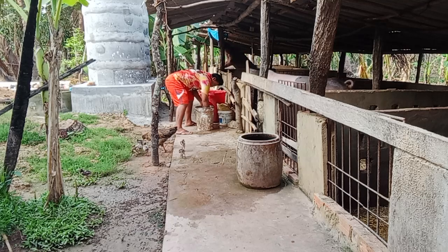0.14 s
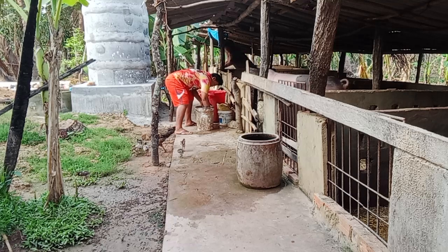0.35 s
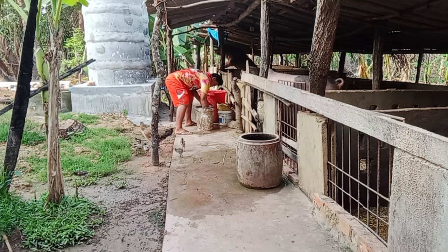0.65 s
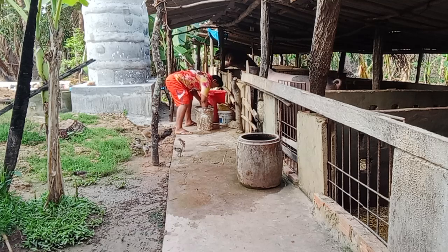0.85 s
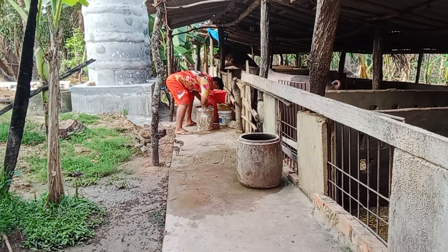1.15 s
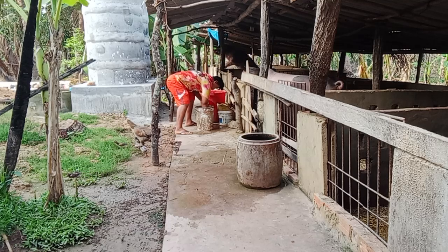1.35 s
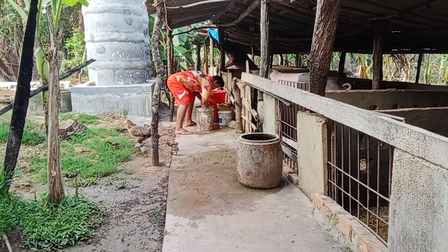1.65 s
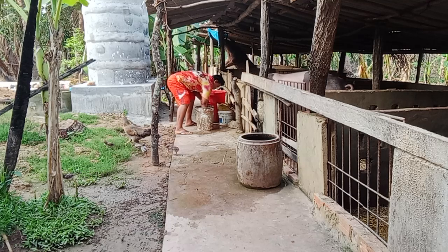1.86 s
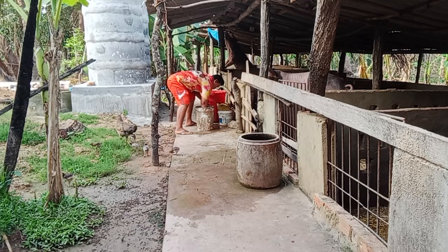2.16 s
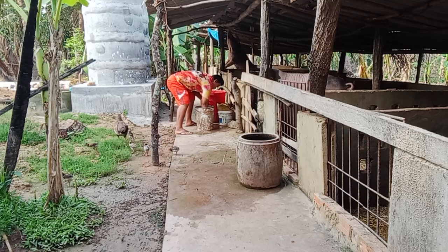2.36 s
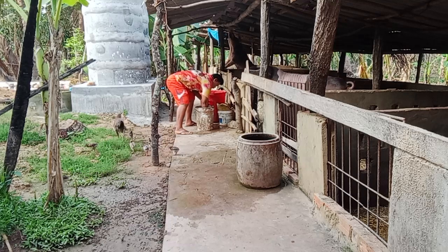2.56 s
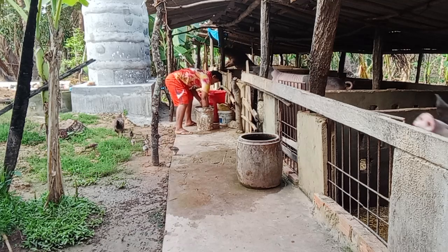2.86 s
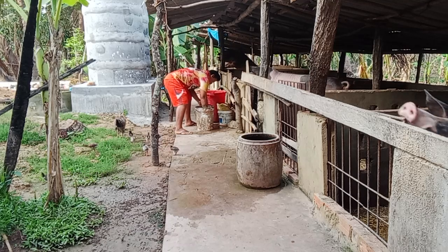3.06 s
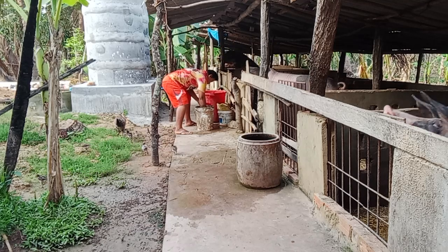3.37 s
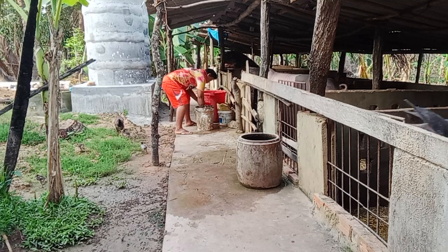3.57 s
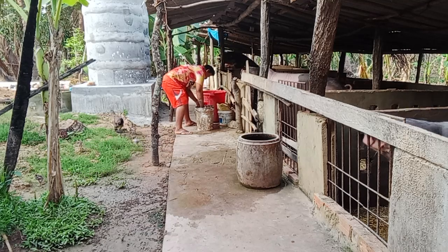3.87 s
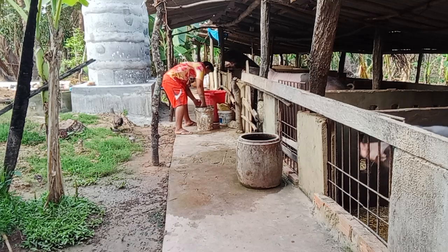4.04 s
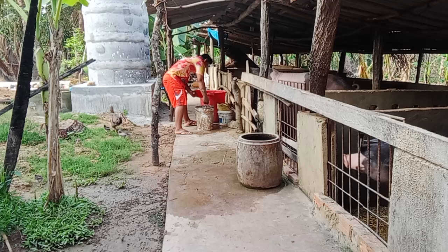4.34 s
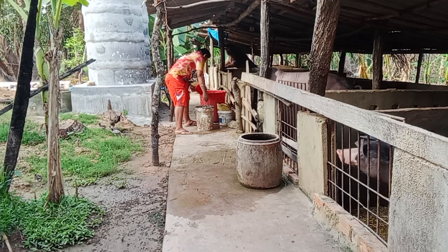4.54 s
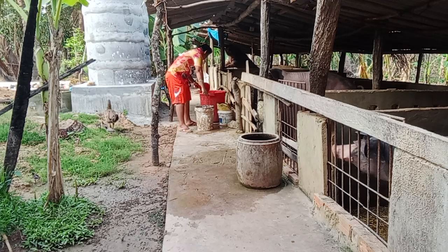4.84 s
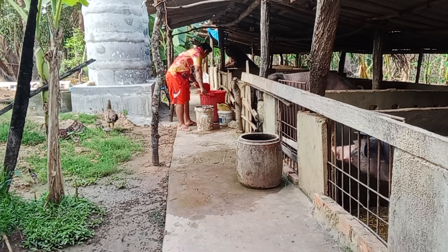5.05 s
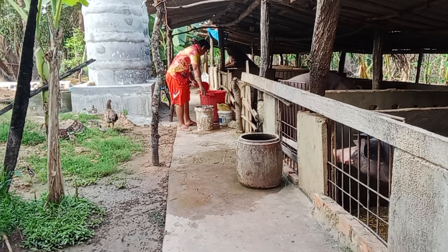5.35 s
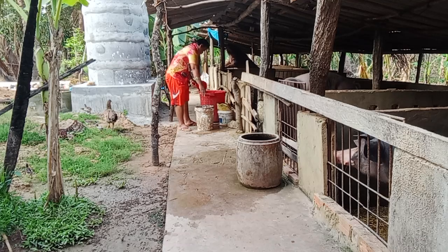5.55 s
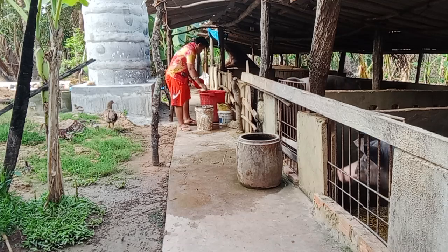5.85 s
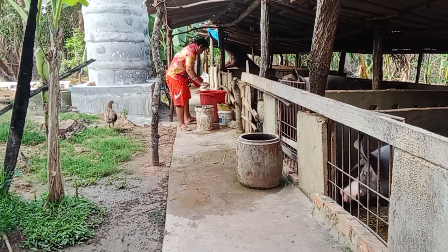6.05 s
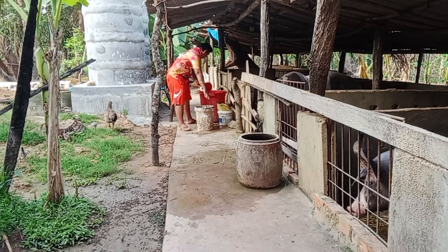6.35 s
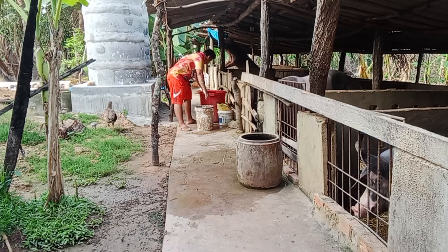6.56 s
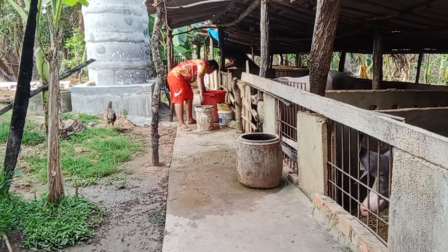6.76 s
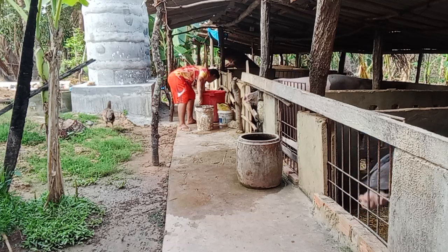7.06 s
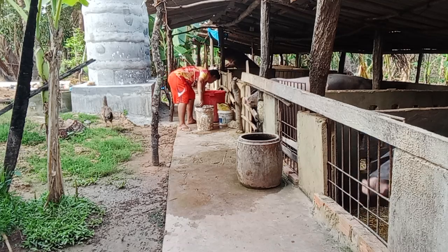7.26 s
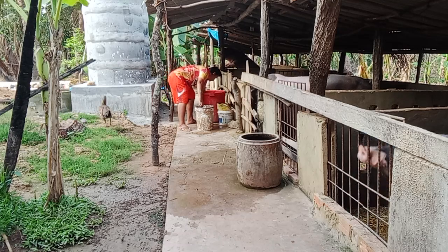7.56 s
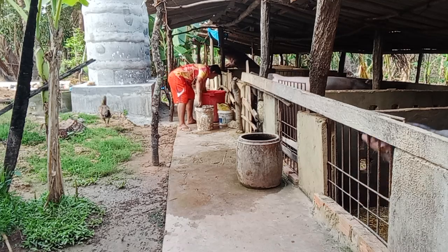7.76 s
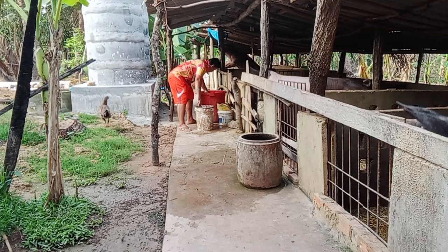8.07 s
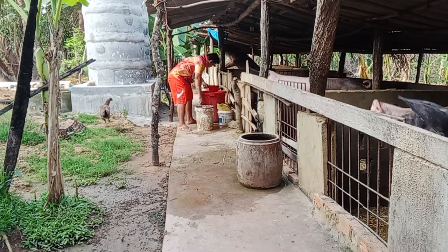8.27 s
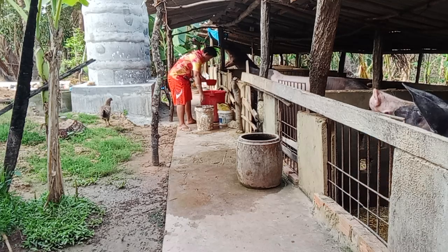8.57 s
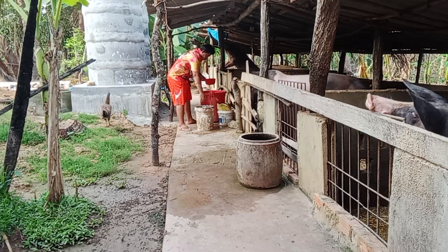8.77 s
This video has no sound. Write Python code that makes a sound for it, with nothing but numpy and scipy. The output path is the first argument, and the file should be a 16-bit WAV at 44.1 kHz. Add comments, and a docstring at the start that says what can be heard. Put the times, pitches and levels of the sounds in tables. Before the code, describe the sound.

Rough, rattling pig grunts and throaty barks over constant chick peeps, with feed swishes, a faint rooster crow and one booming wall bump.

```python
"""Over a restless yard that slowly ebbs, a grunt and then a bark open a chorus of hungry pigs under a tin roof.
Flapping throats excite mouth and snout resonances; chicks peep throughout as tones that break and plunge.
From 2 s feed swishes as filtered noise, clucks and a grunt-like pop are rough pulses, tiny chips twitter.
A thin, strained crow of gliding partials sounds from a distant rooster at 4 s, then a soft moan; past 6 s
a pig thumps the pen wall, whose modes ring, and two light knocks follow as bursts of resonant noise."""
import sys
import numpy as np
from scipy import signal
from scipy.fft import rfft, irfft, next_fast_len
from scipy.io import wavfile
from scipy.ndimage import uniform_filter1d, minimum_filter1d, map_coordinates

SR = 44100
rng = np.random.default_rng(int(sys.argv[2]) if len(sys.argv) > 2 else 0)


def master_out(mix):
    """Clip the mix to full scale and print it as 16-bit PCM to the path in sys.argv[1]."""
    frames = np.transpose(np.atleast_2d(mix))
    ceiling = np.clip(frames, -1, 1)
    pcm = np.round(ceiling * 32767).astype(np.int16)
    wavfile.write(sys.argv[1], SR, pcm)


N = 392931
TIME = np.arange(N) / SR


def amp(db):
    """Decibel law: 20 dB is a tenfold amplitude."""
    return 10 ** (np.asarray(db) / 20)


def unit(x):
    """Normalization by root mean square, to rms 1."""
    return x / np.sqrt(np.mean(x ** 2) + 1e-20)


def along(points, hz):
    """Logarithmic frequency scale: interpolate (Hz, value) points on it."""
    f, v = np.transpose(points)
    return np.interp(np.log(hz + 1), np.log(f + 1), v)


def wobble(n, rate):
    """Band-limited random modulation: a smooth curve of n samples with rate knots a second."""
    knots = rng.standard_normal(int(n * rate / SR) + 4)
    return map_coordinates(knots, [np.arange(n) * rate / SR])


def coloured(x, gain):
    """Minimum-phase filtering: the folded cepstrum gives a causal filter with this gain of frequency."""
    m = 2 * next_fast_len(len(x) // 2 + 4096)
    log_gain = np.log(np.maximum(gain(np.fft.rfftfreq(m, 1 / SR)), 1e-6))
    cepstrum = irfft(log_gain)
    cepstrum[1:m // 2] *= 2
    cepstrum[m // 2 + 1:] = 0
    return irfft(rfft(x, m) * np.exp(rfft(cepstrum)))[:len(x)]


def hiss(n, gain):
    """Spectral shaping of white noise, at rms 1."""
    return unit(coloured(rng.standard_normal(n), gain))


def resonance(hz, centre, width):
    """Resonance curve: gain falls to one half at one width from the centre."""
    return 1 / (1 + ((hz - centre) / width) ** 2)


def resonate(x, hz, width):
    """Heterodyne resonator: shift a centre, fixed or moving, to zero, smooth twice and shift back."""
    turn = np.exp(2j * np.pi * np.cumsum(hz + np.zeros(len(x))) / SR)
    p = np.exp(-2 * np.pi * width / SR)
    smoothed = signal.lfilter([(1 - p) ** 2], [1, -2 * p, p * p], x / turn)
    return 2 * np.real(turn * smoothed)


def add(track, s, x):
    """Superposition: mix x into the track from time s."""
    i = round(s * SR)
    x, i = x[max(-i, 0):], max(i, 0)
    track[i:i + len(x)] += x[:N - i]


def pulses(rate, jitter, scatter_db):
    """Jittered pulse train: uneven pulses of uneven size follow a rate per sample."""
    n = len(rate)
    cycles = np.cumsum(rate * np.exp(jitter * wobble(n, rate.mean()))) / SR
    at = np.flatnonzero(np.diff(np.floor(cycles)))
    train = np.zeros(n)
    train[at] = amp(scatter_db * rng.standard_normal(len(at)))
    return train


def puffs(train, life):
    """Pulsed turbulence: each pulse releases noise whose power decays over life seconds."""
    power = signal.lfilter([1], [1, -np.exp(-1 / (SR * life))], train ** 2)
    return np.sqrt(power) * rng.standard_normal(len(train))


def burst(hz, width, life):
    """Transient excitation: a sudden, short rush of noise through one resonance."""
    t = np.arange(SR // 10) / SR
    rush = rng.standard_normal(len(t)) * np.tanh(10 * t / life) * np.exp(-(t / life) ** 2)
    ring = resonate(rush, hz, width)
    return ring / np.std(ring[t < life])


# reverberation of walls and roof: hz [Hz], t60_s [s]
PEN_DECAY = [(70, 0.33), (450, 0.22), (1100, 0.23), (2800, 0.18), (9000, 0.098)]


def pen(x, wet_db):
    """Frequency-dependent reverberation: walls and roof answer, and each frequency dies at its own speed."""
    hz, t, z = signal.stft(rng.standard_normal(SR * 3 // 4), SR, nperseg=256)
    decay = amp(-60 * t / along(PEN_DECAY, hz)[:, None])
    tail = signal.istft(z * decay, SR, nperseg=256)[1]
    tail = np.pad(tail / np.linalg.norm(tail), (SR // 200, 0))
    return x + amp(wet_db) * signal.fftconvolve(x, tail)[:N]


def near_walls(x, echo_db, count=6):
    """Early reflection: a few delayed copies come from the ground and the pen front."""
    lags = rng.uniform(0.0017, 0.019, count)
    return x + amp(echo_db) * sum(np.pad(x, (int(lag * SR), 0))[:N] for lag in lags)


# background spectrum, before scaling to rms 1: hz [Hz], density_db [dB per Hz]
YARD_SPECTRUM = [(15, -39.5), (30, -2), (74, 5.5), (125, -4), (565, -2), (2970, -13), (11500, -38),
                 (16000, -65.5)]
# background level, about which it sways: time_s [s], level_db [dB]
YARD_LEVEL = [(0, -42.5), (2.3, -43.5), (5.2, -47), (8.5, -46)]
YARD_SWAY_DB, RUSTLE_DB = 1.8, -68  # rustle rms before its own swells


def yard():
    """Amplitude-modulated noise: a restless farm background, and a faint high rustle that comes and goes."""
    db = np.interp(TIME, *np.transpose(YARD_LEVEL))
    sway = amp(db + YARD_SWAY_DB * wobble(N, 5.6))
    body = sway * hiss(N, lambda hz: amp(along(YARD_SPECTRUM, hz)))
    swells = amp(4 * wobble(N, 9) + 3 * wobble(N, 60))
    rustle = swells * hiss(N, lambda hz: resonance(hz, 8300, 800) ** 1.5)
    return body + amp(RUSTLE_DB) * rustle


# light knocks in the pen: start_s [s], level_db [dB]
KNOCKS = [(6.949, -33.5), (7.085, -36)]


def knocks():
    """Damped impact: dry taps of something bumped in the pen."""
    out = np.zeros(N)
    for s, db in KNOCKS:
        add(out, s, amp(db) * burst(hz=1100, width=550, life=0.016))
    return out


# swishes of feed: start_s [s], length_s [s], level_db [dB, before the rise and fall]
SWISHES = [(1.946, 0.32, -41.5), (4.744, 0.077, -37.5), (4.841, 0.21, -38)]
# wet spray spectrum: hz [Hz], gain_db [dB]
SPRAY_SPECTRUM = [(500, -7.5), (2500, -1.5), (6000, -10), (8500, -3), (12000, -43)]


def basin():
    """Granular turbulence: wet feed swishes as a spray of noise with fast random swells."""
    out = np.zeros(N)
    for s, length, db in SWISHES:
        n = int(length * SR)
        splashes = rng.standard_normal(n) * amp(2.4 * wobble(n, 510))
        spray = coloured(splashes, lambda hz: amp(along(SPRAY_SPECTRUM, hz)))
        add(out, s, amp(db) * unit(spray) * np.hanning(n))
    return out


# twitters and squeaks: start_s [s], length_s [s], level_db [dB, mean over chips], pitch_hz [Hz, mean]
CHIRPS = [(3.83, 0.2, -44.5, 6240), (3.93, 0.082, -37.5, 2770), (4.37, 0.27, -47, 6170),
          (6.157, 0.3, -53.5, 7080), (8.234, 0.11, -48, 6970), (8.414, 0.11, -49, 7000)]
CHIP_S, CHIP_GAP_S, CHIP_SPREAD = 0.025, 0.008, 0.08  # length, spacing and pitch scatter (share) of chips
QUIVER_DB = 3.0  # strength scatter of chips and peeps


def chirps():
    """Granular tone: each twitter is a flurry of tiny shivering chips, scattered in pitch and strength."""
    out, n = np.zeros(N), int(CHIP_S * SR)
    for s, length, db, hz in CHIRPS:
        for start in np.arange(s, s + length - CHIP_S / 2, CHIP_GAP_S):
            stray, size = rng.standard_normal(2)
            pitch = hz * (1 + CHIP_SPREAD * stray + .015 * wobble(n, 450))
            phase = 2 * np.pi * np.cumsum(pitch) / SR
            add(out, start, amp(db + QUIVER_DB * size) * np.hanning(n) * np.sin(phase))
    return out


ARCH_HZ, PEEP_END_HZ = 230, 2237  # upward bow of the high note; pitch about which the plunge ends
PLUNGE_S, PLUNGE_SHARE = 0.03, 0.18  # a plunge takes this long, plus a share of the peep
BEND, KINK = 0.015, 0.035  # slow unsteadiness of pitch; stumble during the plunge (shares)


def peep(length, start_hz, knee_hz, note_db, plunge_db):
    """Register break: a soft high note arches, then the voice breaks and plunges; no two bend alike."""
    left = np.arange(length, 0, -1 / SR)  # time until the peep ends
    n, plunge_s = len(left), PLUNGE_S + PLUNGE_SHARE * length
    height = np.minimum(left / plunge_s, 1) ** 0.85
    early = np.maximum(left - plunge_s, 0) / (length - plunge_s)
    note = (start_hz - knee_hz) * early + ARCH_HZ * np.sin(np.pi * early)
    broken = (1 - np.tanh((left - 0.858 * plunge_s) / 0.0076)) / 2
    unsteady = 1 + BEND * wobble(n, 25) + KINK * broken * wobble(n, 110)
    pitch = (PEEP_END_HZ + (knee_hz - PEEP_END_HZ) * height + note) * unsteady
    phase = 2 * np.pi * np.cumsum(pitch) / SR
    db = note_db + (plunge_db - note_db) * broken + QUIVER_DB * wobble(n, 89.3)
    envelope = amp(db) * np.tanh(left / 0.0094) * np.tanh((length - left) / 0.019)
    return envelope * (np.sin(phase) + amp(-30) * broken * np.sin(2 * phase))


# near chicks; pitches and levels are centres of random sway: end_s [s], length_s [s], start_pitch_hz [Hz],
# break_pitch_hz [Hz], note_level_db [dB], plunge_level_db [dB]
PEEPS = [(0.498, 0.16, 4700, 4090, -47, -42.5), (1.15, 0.2, 4800, 4130, -46.5, -32),
         (1.812, 0.19, 3950, 3200, -42.5, -32), (1.863, 0.21, 4700, 4204, -41.5, -27),
         (1.923, 0.1, 3000, 2750, -28.5, -45), (2.645, 0.16, 4500, 3780, -41, -25.5),
         (2.906, 0.1887, 4300, 4304, -51, -24), (3.283, 0.26, 5300, 4240, -48, -38.5),
         (3.871, 0.21, 4800, 4020, -47.5, -33), (4.407, 0.18, 4750, 4190, -49, -31.5),
         (4.937, 0.27, 4600, 4080, -43, -37.5), (5.611, 0.29, 4300, 4220, -43.5, -38),
         (5.694, 0.24, 4650, 3910, -50, -34.5), (6.323, 0.26, 4350, 4040, -40, -31.5),
         (6.385, 0.25, 4600, 4060, -51, -36.5), (6.607, 0.11, 4500, 4040, -42.5, -36),
         (6.761, 0.11, 4260, 3850, -42.5, -35), (7.229, 0.23, 4150, 3800, -45.5, -34.5),
         (7.359, 0.15, 4150, 3520, -41, -40), (7.532, 0.18, 5000, 3830, -52.5, -31),
         (7.931, 0.18, 5200, 4130, -47, -40), (8.438, 0.29, 4950, 4064, -46.5, -30.5),
         (8.766, 0.19, 4750, 3970, -52, -37.5)]
FAR_PEEP_DB = -52


def chicks(count=26):
    """Superposed glides: near chicks, and the rest of the brood peeping at random further off."""
    out = np.zeros(N)
    for end, length, *voice in PEEPS:
        add(out, end - length, peep(length, *voice))
    for k, (when, size, slow) in enumerate(rng.random((count, 3))):
        hz = 3900 + 1400 * size
        start = (k + when) * N / SR / count
        add(out, start, peep(.14 + 0.18 * slow, hz, .85 * hz, FAR_PEEP_DB, FAR_PEEP_DB))
    return out


# short clucks and a grunt-like pop: start_s [s], decay_s [s, time to fall to 1/e],
# level_db [dB, before the envelope], resonance_hz [Hz], width_hz [Hz]
CLUCKS = [(2.662, 0.046, -20.5, 908, 190), (2.782, 0.063, -28.5, 624.6, 260),
          (3.943, 0.036, -22.5, 617.5, 170), (6.741, 0.073, -37.5, 567, 50), (7.055, 0.034, -34.5, 367, 90),
          (7.44, 0.027, -23.5, 394.5, 109), (8.2, 0.034, -21.5, 775, 55)]


def clucks():
    """Source-filter principle: clucks and a grunt-like pop pass one main resonance and a weak broad one."""
    out = np.zeros(N)
    for s, decay, db, centre, width in CLUCKS:
        t = np.arange(int(3 * decay * SR)) / SR

        def tract(hz):
            """Parallel resonance under a gentle treble loss."""
            both = resonance(hz, centre, width) + amp(-22) * resonance(hz, 780, 1100)
            return both * resonance(hz, 0, 5000)

        train = pulses(np.full(len(t), centre / 2), jitter=0.04, scatter_db=4)
        flow = unit(train) + 1.2 * rng.standard_normal(len(t))
        envelope = (1 - np.exp(-t / 0.0025)) * np.exp(-(t / decay) ** 2)
        add(out, s, amp(db) * unit(coloured(flow, tract)) * envelope)
    return out


# distant rooster crow: time_s [s], pitch_hz [Hz, before wavering], second_partial_db [dB, before wavering],
# third_partial_db [dB, before a 4 dB lift]
CROW = [(4.25, 512, -72, -48), (4.424, 531, -57.5, -41.5), (4.851, 508, -31.5, -35.5),
        (4.896, 474.5, -36, -50), (5.13, 401, -37.5, -65)]


def crow():
    """Additive synthesis with frequency modulation: a thin, strained, wavering crow that sinks at its end."""
    t = np.arange(CROW[0][0], CROW[-1][0], 1 / SR)
    n = len(t)
    s, *cols = np.transpose(CROW)
    hz, second_db, third_db = [np.interp(t, s, c) for c in cols]
    pitch = hz * (1 + 0.012 * wobble(n, 40) + 0.012 * wobble(n, 300))
    phase = 2 * np.pi * np.cumsum(pitch) / SR
    upper = np.sin(3 * phase + 1.1 * wobble(n, 250)) + amp(-15) * np.sin(6 * phase)
    second = amp(second_db + 2.8 * wobble(n, 44.1)) * np.sin(2 * phase + 0.29 * wobble(n, 200))
    note = second + amp(third_db + 4.0) * upper
    out = np.zeros(N)
    add(out, s[0], note * signal.windows.tukey(n, .1))
    return out


MOAN_START_S, MOAN_LENGTH_S = 5.31, 0.24


def moan(pitch_hz=255, db=-43):
    """Harmonic series: a soft, clear whine from the back of the pen, its partials weakening as 1/k."""
    n = int(MOAN_LENGTH_S * SR)
    phase = 2 * np.pi * np.cumsum(pitch_hz * (1 + 0.025 * wobble(n, 38.7))) / SR
    tone = unit(sum(np.sin(k * phase) / k for k in range(1, 7)))
    out = np.zeros(N)
    add(out, MOAN_START_S, amp(db) * signal.windows.tukey(n) * tone)
    return out


# wall modes: hz [Hz], level_db [dB, relative to the blow], t60_s [s]
WALL_MODES = [(172.7, 3, 0.27), (225, 0, 0.13), (365, -14.5, 0.32), (791, -22, 0.43)]
# blows on the wall: start_s [s], level_db [dB]
THUMPS = [(6.321, -7), (6.3445, -11)]


def thump():
    """Modal synthesis: a heavy soft body meets the wall, whose modes boom and rattle briefly."""
    out, t = np.zeros(N), np.arange(SR // 2) / SR
    attack = 1 - np.exp(-t / .0025)
    for s, db in THUMPS:
        boom = sum(amp(g - 60 * t / t60) * np.sin(2 * np.pi * hz * t) for hz, g, t60 in WALL_MODES)
        rattle = amp(-12.5 - 60 * t / 0.42) * hiss(len(t), lambda hz: resonance(hz, 520, 1360) ** 2)
        add(out, s, amp(db) * (boom + rattle) * attack)
    return out


SAG_DB_PER_S, RELEASE_S = 7.5, 0.092


def effort(age, length, lead_db, open_db, swell_s, release_db):
    """Amplitude envelope: a soft lead-in, a sudden opening, a swell, a slow sag and a release."""
    swell = np.where(age < 0, lead_db, open_db * np.clip(1 - age / swell_s, 0, 1))
    release = release_db * np.clip(1 - (length - age) / min(RELEASE_S, length), 0, 1)
    return amp(swell - SAG_DB_PER_S * np.maximum(age, 0) + release)


WANDER, WANDER_DB = 0.025, 2.0  # strays of a resonance in pitch (share) and strength


def straying(resonances, n):
    """Time-varying formants: (Hz, width Hz, dB) resonances stray in pitch and strength as the mouth works."""
    return [(hz * (1 + WANDER * wobble(n, 19.6)), width, g + WANDER_DB * wobble(n, 16.85))
            for hz, width, g in resonances]


# air friction in the throat, before each call's rasp gain: hz [Hz], gain_db [dB]
RASP = [(1500, -34), (3500, -22), (4400, -28), (5500, -42), (8200, -39), (9500, -50), (15000, -72)]
FLAP_SCATTER_S, FLAP_SCATTER_DB = 0.00081, 1.26  # no two flaps are alike
FLAP_TREBLE_DB = 5  # hard flaps are brighter than the roar


def pig_call(t, level, period, formants, flutter, jitter, scatter_db, rough, puff_life,
             flap_db, flap_life, flapping_s, rasp_db, closure):
    """Source-filter principle: a fluttering throat and a run of hard flaps excite mouth or snout."""
    def throat(x):
        """Parallel formants beside the friction spectrum."""
        friction = coloured(x, lambda hz: amp(along(RASP, hz) + rasp_db))
        return friction + sum(amp(g) * resonate(x, c, w) for c, w, g in formants)

    train = pulses(np.full(len(t), flutter), jitter, scatter_db)
    rough = np.clip(rough, 0, 1)
    flow = np.sqrt(1 - rough) * unit(train) + np.sqrt(rough) * unit(puffs(train, puff_life))
    # one flap at the lead-in, then a regular run
    beats = np.append(t[0], np.arange(0, t[-1], period))
    late, size = rng.standard_normal((len(beats), 2)).T
    age = t - (beats + FLAP_SCATTER_S * late)[:, None]
    hardness = np.exp(-(beats / flapping_s) ** 4)
    strength = hardness * amp(flap_db + FLAP_SCATTER_DB * size)
    bursts = strength @ ((age >= 0) * np.exp(-(age / flap_life) ** 2))
    # the throat closes for a moment before each hard flap
    closing = (age < 0) * np.exp(-(age / 0.0099) ** 2)
    shut = 1 - np.clip(closure, 0, 1) * hardness @ closing
    flap_spectrum = [(500, 0.5), (2500, FLAP_TREBLE_DB), (9000, -3.0)]
    flap_noise = coloured(rng.standard_normal(len(t)), lambda hz: amp(along(flap_spectrum, hz)))
    voice = throat(level * (flow * shut + bursts * flap_noise)) / np.std(throat(flow))
    return voice * np.minimum((t[-1] - t) * 100, 1)


# closed-mouthed grunts: start_s [s], length_s [s], level_db [dB, before the envelope], chest_db [dB],
# brightness_db [dB], middle_nostril_rise [share over the call]
GRUNTS = [(0.11, 0.27, -19.5, -4.5, 1.5, 0.42), (0.893, 0.32, -20, -3, 0, 0.12),
          (3.009, 0.19, -20, -2, 0.5, 0.016), (4.179, 0.13, -18, -6, -3.5, 0),
          (7.38, 0.14, -30.5, -2, -7, 0.33), (7.542, 0.18, -21, -2, 0, 0.072),
          (8.53, 0.16, -22.5, 0, -2, 0.096)]
# broad chest boom: hz [Hz], width_hz [Hz]
GRUNT_CHEST = (201, 108)
# low snout resonances: hz [Hz], width_hz [Hz], gain_db [dB]
SNOUT = [(73, 15, -1), (385, 41.3, 4), (504.4, 19, -3.5)]
# upper snout resonances: hz [Hz], width_hz [Hz], gain_db [dB, before brightness and effort]
NOSTRILS = [(876, 63.6, 0.5), (1443, 153, -9.5), (2727, 130, -25)]
GRUNT_FLAP_S, SNOUT_OPENS_DB = 0.029, 5.5  # rattle period; brightening with effort


def grunts():
    """Nasal resonance: low calls swell and rattle; upper snout resonances open with effort and glide."""
    out = np.zeros(N)
    for s, length, db, chest_db, bright_db, glide in GRUNTS:
        t = np.arange(-GRUNT_FLAP_S, length, 1 / SR)
        level = effort(t, length, lead_db=-8, open_db=-5.5, swell_s=0.063, release_db=-15.5)
        lift_db = bright_db + SNOUT_OPENS_DB * (level - 1)
        low, (mid_hz, *mid), high = [(hz, width, g + lift_db) for hz, width, g in NOSTRILS]
        gliding = (mid_hz * (1 + glide * (t / length - .5)), *mid)
        snout = straying([(*GRUNT_CHEST, chest_db), *SNOUT, low, gliding, high], len(t))
        voice = pig_call(t, level, GRUNT_FLAP_S, snout, flutter=66, jitter=.2, scatter_db=2, rough=.45,
                         puff_life=.008, flap_db=-5, flap_life=.013, flapping_s=.3, rasp_db=-12, closure=.55)
        add(out, s - GRUNT_FLAP_S, amp(db) * voice)
    return out


# open-mouthed barks: start_s [s], length_s [s], level_db [dB, before the envelope], opening_level_db [dB],
# flap_period_s [s], flap_strength_db [dB], jaw_hz [Hz], jaw_db [dB, at mid-call], opening_tongue_hz [Hz],
# settled_tongue_hz [Hz], cheek_db [dB], brightness_db [dB], rasp_db [dB]
BARKS = [(0.525, 0.27, -13.5, -1, 0.0265, 1, 583, 4.5, 1040, 980, -3.5, -7.5, -3.5),
         (1.248, 0.37, -17.5, 0, 0.025, 3.5, 537, 4.5, 884, 1015, -3.5, 0, 1.5),
         (2.434, 0.24, -18.5, -7.5, 0.032, -1, 206, 6.5, 800, 964, -7, 3, -6),
         (3.324, 0.25, -15.5, -5, 0.03, 4.5, 545, 3.5, 1115, 1185, -19, -4, -11),
         (5.847, 0.27, -22.5, -3, 0.034, 3.5, 560, -0.5, 1360, 1043, -8.5, -9.5, -7),
         (7.991, 0.074, -18.5, 0.5, 0.045, -1, 392, -1, 1110, 1110, -1, -1.5, -3.5),
         (8.046, 0.14, -18, -3.5, 0.0292, 2, 400, -17, 1120, 1090, -3, -4.5, -9)]
# upper resonances: hz [Hz], gain_db [dB, before brightness]
TEETH = [(1790, -0.5), (2550, -8.5)]
# hard bright flaps and small smacks at or before some barks: start_s [s], level_db [dB], resonance_hz [Hz]
SMACKS = [(0.58, -19, 2640), (1.221, -26.5, 1780), (1.274, -14, 950), (3.255, -28, 1820),
          (8.048, -18.5, 1125), (8.076, -15.5, 1820)]
# the bark's level is subtracted from these two gains, so they boom equally in soft and loud barks
BELLY_HZ, BELLY_DB, CHEST_HZ, CHEST_DB = 72.6, -22, 161.5, -18.5
PALATE_HZ, PALATE_DB, CHEEK_HZ = 387, -1, 1356  # resonances that all barks share
TONGUE_GLIDE_S, JAW_GROWS_DB = 0.052, 6  # the tongue settles early; the jaw takes over as the mouth closes


def barks():
    """Formant transition: harsh open-mouthed calls darken as the effort fades and the mouth closes."""
    out = np.zeros(N)
    for (s, length, db, open_db, period, flap_db, jaw_hz, jaw_db,
         opening_hz, settled_hz, cheek_db, bright_db, rasp_db) in BARKS:
        t = np.arange(-period, length, 1 / SR)
        tongue_hz = settled_hz + (opening_hz - settled_hz) * np.exp(-(t / TONGUE_GLIDE_S) ** 2)
        growing_jaw_db = jaw_db + JAW_GROWS_DB * (t / length - .5)
        mouth = [(BELLY_HZ, BELLY_DB - db), (CHEST_HZ, CHEST_DB - db), (PALATE_HZ, PALATE_DB),
                 (jaw_hz, growing_jaw_db), (tongue_hz, 0), (CHEEK_HZ, cheek_db),
                 *[(hz, g + bright_db) for hz, g in TEETH]]
        # higher resonances are wider
        formants = straying([(hz, 24 + 0.072 * np.mean(hz), g) for hz, g in mouth], len(t))
        level = effort(t, length, lead_db=-12.5, open_db=open_db, swell_s=0.05, release_db=-17.0)
        voice = pig_call(t, level, period, formants, flutter=70, jitter=0.35, scatter_db=3.5, rough=0.75,
                         puff_life=0.008, flap_db=flap_db, flap_life=0.013, flapping_s=0.17,
                         rasp_db=rasp_db, closure=0.65)
        # the greatest effort still to come sets how much treble passes
        opening = np.maximum.accumulate(level[::-1])[::-1] / level.max()
        dark = signal.sosfiltfilt(signal.butter(2, 1400, fs=SR, output="sos"), voice)
        add(out, s - period, amp(db) * (dark + (voice - dark) * opening ** .3))
    for s, db, hz in SMACKS:
        add(out, s, amp(db) * burst(hz, width=hz / 7, life=0.017))
    return out


CALLS_TOP_HZ = 9000  # low-pass corner for the pigs' calls and the crow


def scene():
    """Superposition of direct and reverberant sound: pigs, and birds echoing among the same walls."""
    calls = pen(barks(), wet_db=-5.5) + pen(grunts() + crow() + moan(), wet_db=-2.5)
    calls = signal.sosfilt(signal.butter(6, CALLS_TOP_HZ, fs=SR, output="sos"), calls)
    birds = pen(near_walls(chicks() + chirps(), echo_db=-13), wet_db=-1.5)
    pops = pen(clucks() + knocks(), wet_db=-5)
    wall = pen(thump(), wet_db=-9.5)
    feed = pen(basin(), wet_db=-6.5)
    return (calls + birds + pops + wall + feed + yard())[None]


TOP_HZ = 15500


def record(dry):
    """Band limitation and peak limiting: the microphone sheds deep bass, high peaks and the top treble."""
    x = signal.sosfilt(signal.butter(4, 55, "high", fs=SR, output="sos"), dry)
    needed = np.minimum(1, .86 / (abs(x) + 1e-9))
    x = x * uniform_filter1d(minimum_filter1d(needed, size=301), size=301)
    return irfft(rfft(x) * (np.fft.rfftfreq(N, 1 / SR) < TOP_HZ), N)


dry = scene()
out = record(dry)
master_out(out)
```